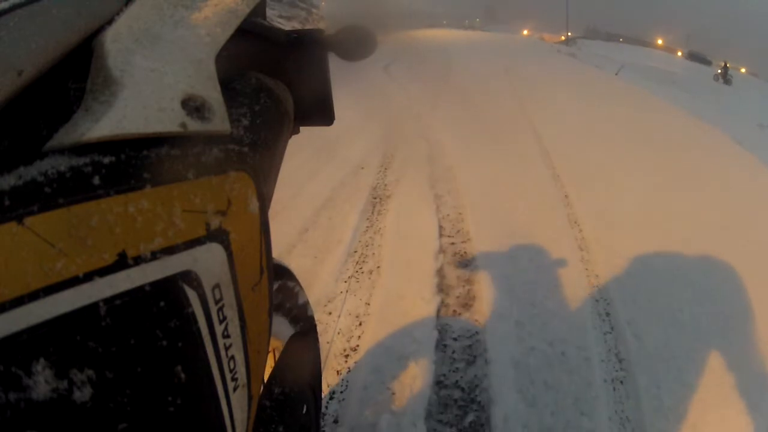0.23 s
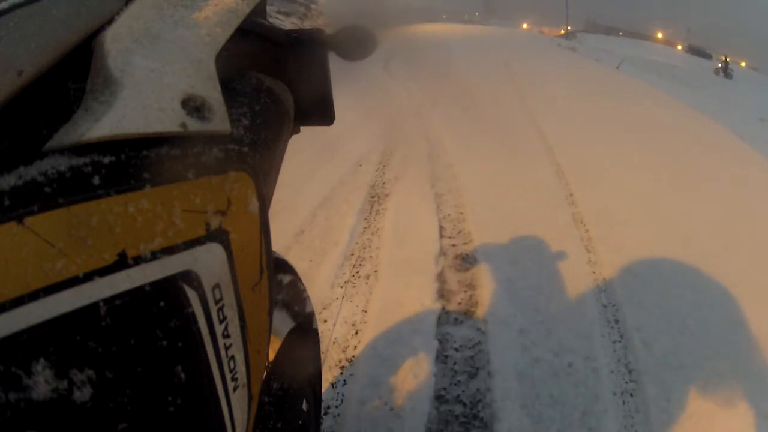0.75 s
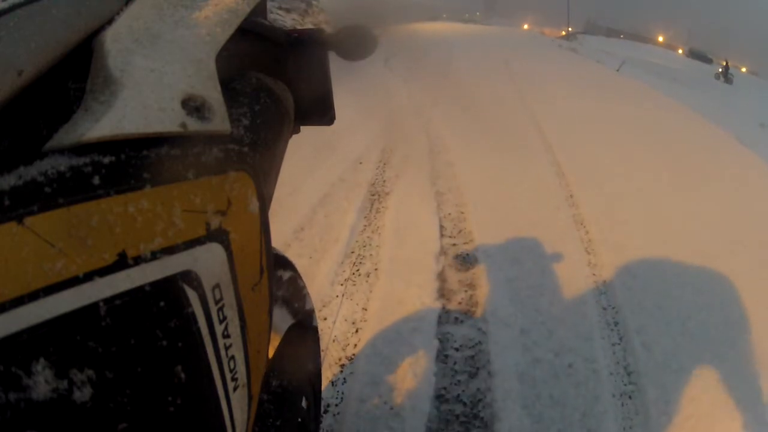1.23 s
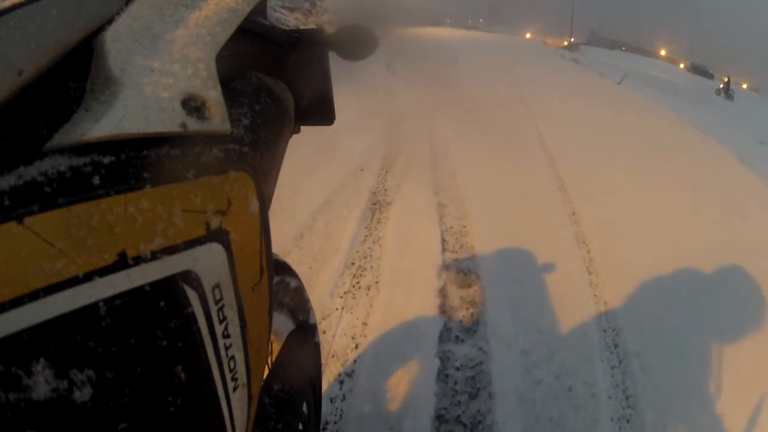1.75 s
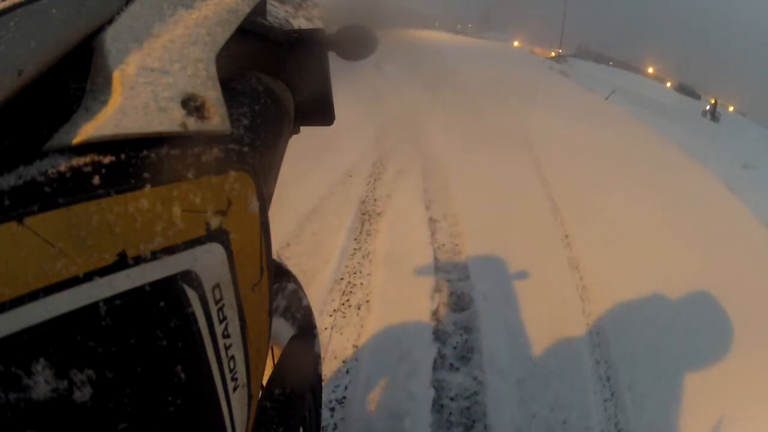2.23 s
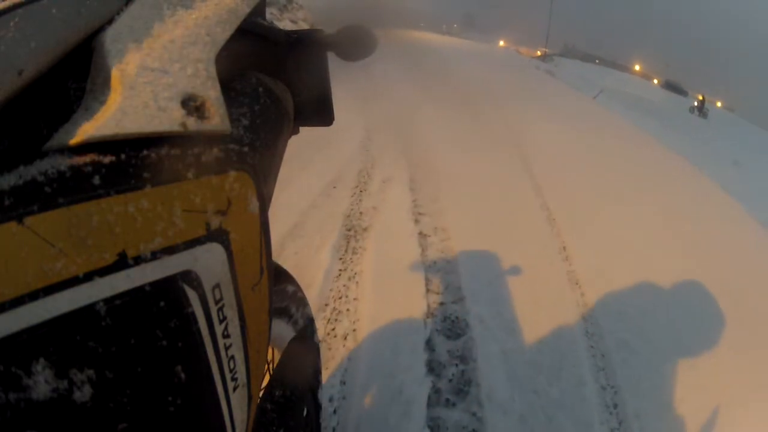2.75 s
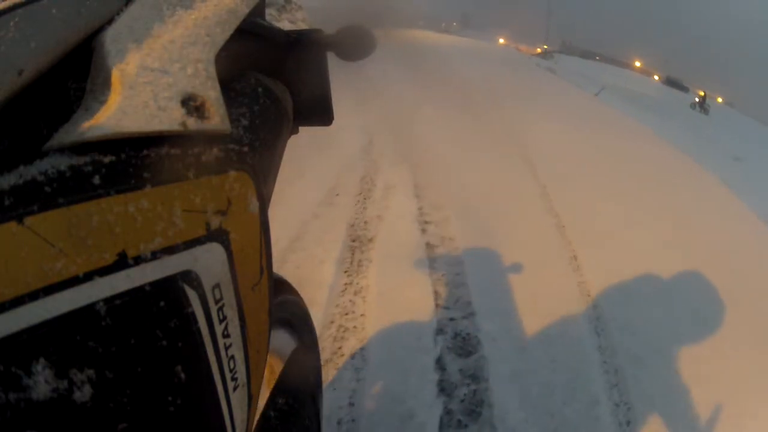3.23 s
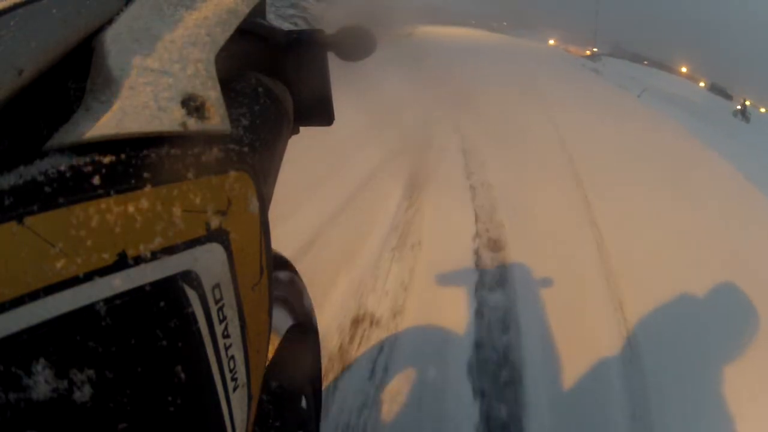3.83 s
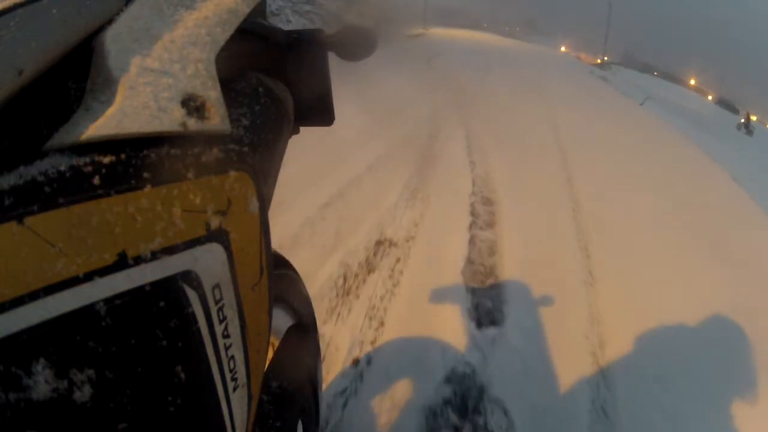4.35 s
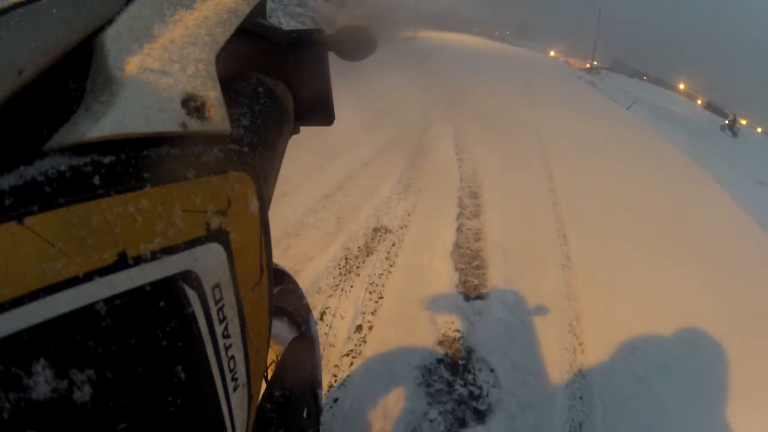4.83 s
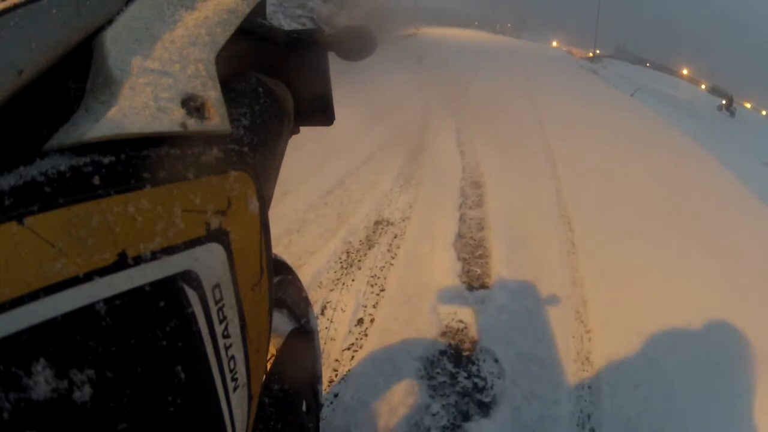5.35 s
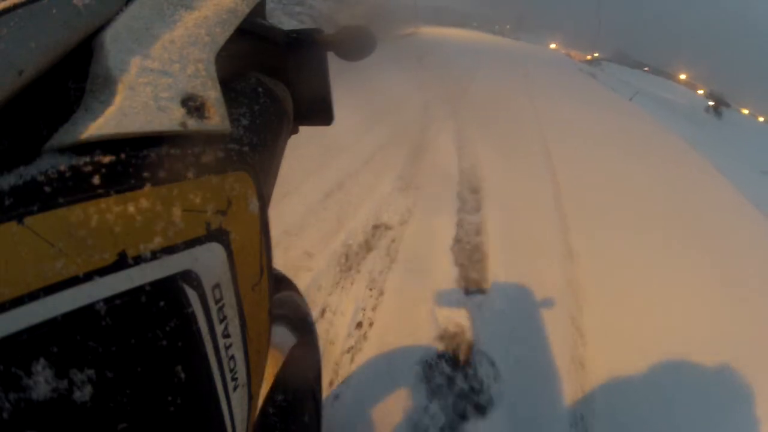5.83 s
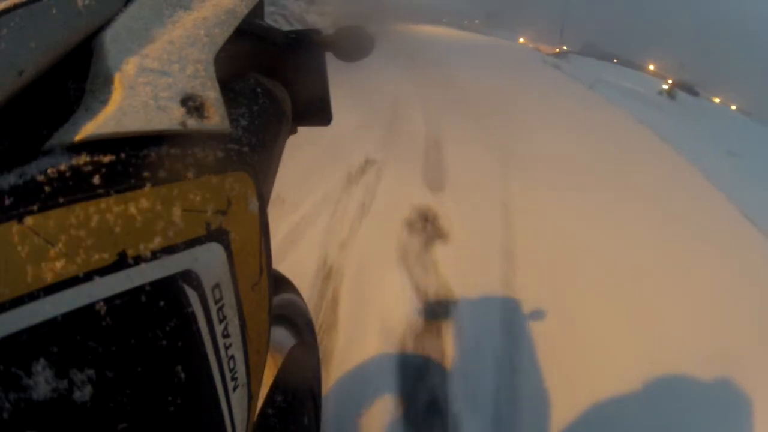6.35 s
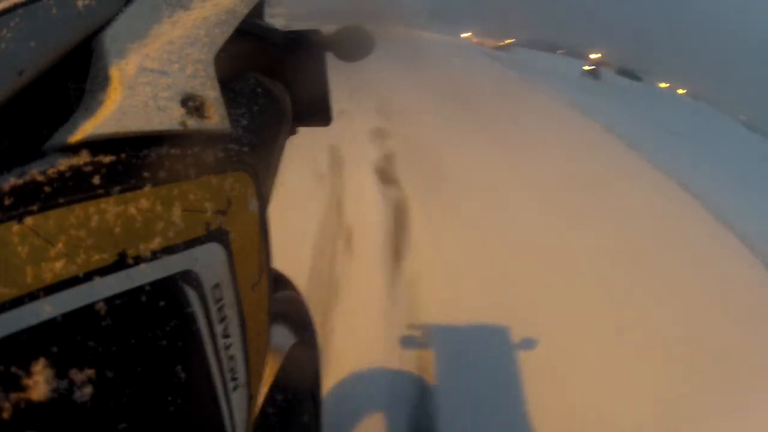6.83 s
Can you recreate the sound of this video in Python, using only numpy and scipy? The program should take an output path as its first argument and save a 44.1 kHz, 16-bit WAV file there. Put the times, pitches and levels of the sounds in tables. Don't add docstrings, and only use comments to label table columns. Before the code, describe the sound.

A small two-stroke motorbike on snow, heard very close through a cheap microphone fixed to its shaking frame. From 0 to 1 s the closed-throttle engine slows, with dry irregular exhaust cracks about ten a second over falling frame hum. From 1 to 2.6 s it is quietest: ticking casing rattle, soft port hiss, low clamp hum, faint weak pops. Cracks gather from 2.66 s and at 2.87 s it leaps into a hard barking pull, snow drumming on the mudguard, wavering as the tyre slips until 3.74 s. Separate sharp pops follow as revs drop, to 4.6 s. Brief blips come at 4.6 and 4.9 s with cracks between. At 5.4 s it surges upward, reaching full speed by 5.65 s: a dense, rough, buzzing roar with heavy low vibration, dipping slightly around 6.2 s and climbing again to the 7 s end. Light wind rumble and metallic, fizzy clipping throughout.

```python
import sys
import numpy as np
from scipy import signal
from scipy.fft import rfft, irfft
from scipy.io import wavfile
from scipy.ndimage import uniform_filter1d

SR = 44100
rng = np.random.default_rng(int(sys.argv[2]) if len(sys.argv) > 2 else 0)


def convert_level_to_amplitude(level_db):
    exponent = np.asarray(level_db, float) / 20
    return 10 ** exponent


def to_wav(s):
    ch = np.atleast_2d(s).T
    pcm = np.round(np.clip(ch, -1, 1) * 32767)
    wavfile.write(sys.argv[1], SR, pcm.astype(np.int16))


N = 312224


def rms_one(x):
    return x / np.sqrt(np.mean(x ** 2) + 1e-20)


def drift(rate_hz):
    r = np.exp(-80 * np.pi * rate_hz / SR)
    slow = signal.lfilter([1], [1, -2 * r, r * r], rng.standard_normal(N // 40 + 2002))[2000:]
    return np.interp(np.arange(N) / 40, np.arange(len(slow)), rms_one(slow))


def bumps(rows):
    clock = np.arange(N) / SR
    return sum(size * np.maximum(0, 1 - np.abs(clock - s) / half_s) for s, size, half_s in rows)


def at_speed(points, speed):
    turns_per_s, level_db = np.transpose(points)
    return np.interp(np.log(speed), np.log(turns_per_s), level_db)


def burst(rise_s, fall_s):
    t = np.arange(SR // 25) / SR
    shape = (1 - np.exp(-t / rise_s)) ** 2 * np.exp(-t / fall_s)
    return shape / np.sqrt(np.sum(shape ** 2))


def resonate(x, modes):
    click = np.arange(SR // 4) == 0
    out, answer = 0, 0
    for k, (hz, width_hz, level_db) in enumerate(modes):
        r = np.exp(-np.pi * width_hz / SR)
        b = (-1) ** k * convert_level_to_amplitude(level_db) * (1 - r * r) / 2 * np.array([1, 0, -1])
        a = [1, -2 * r * np.cos(2 * np.pi * hz / SR), r * r]
        out = out + signal.lfilter(b, a, x + 1e-18)
        answer = answer + signal.lfilter(b, a, click + 1e-18)
    return out / np.sqrt(np.sum(answer ** 2))


def once_a_turn(turns, offset):
    return np.diff(np.floor(turns - offset), prepend=np.floor(turns[0] - offset)) > 0


# (time [s], speed [turns/s])
SPEED = [(0, 55.5), (.58, 36.7), (1.02, 22.5), (2.72, 24.4), (3.02, 79), (3.8, 71.5), (3.97, 53),
         (4.14, 54.8), (4.3, 44.5), (4.6, 38), (4.72, 60.5), (4.87, 56), (5.02, 85), (5.4, 69), (5.53, 109),
         (5.6, 145), (6.32, 142.7), (7.0, 155.5)]
# (time [s], speed change [turns/s], half length [s])
SURGES = [(1.5, -1.2, .3), (2.08, 6.5, .42), (3.055, 7, .055), (3.2, 3, .08), (3.36, -2.5, .1),
          (3.55, 4, .1), (3.72, -2, .08), (3.97, -1, .05), (5.15, -3.5, .12), (5.33, -2.5, .07),
          (5.645, 12, .045), (5.718, -8, .05), (5.79, 3, .06), (6.14, -7, .1), (6.23, -7.5, .09),
          (6.43, -6.5, .1)]


def crank_speed():
    s, turns_per_s = np.transpose(SPEED)
    return np.interp(np.arange(N) / SR, s, turns_per_s) + bumps(SURGES)


def crank_turns(speed):
    start_turn, lead_s, settle_s = -.27, .0022, .06
    turns = start_turn + np.cumsum(speed) / SR
    firings_s = [row[0] for row in STRAY_IDLE[1:] + STRAY_COAST + PULLS[:4]]
    at = np.sort([round((s + lead_s) * SR) for s in firings_s])
    nudge, nudges = 0, []
    for i in at:
        nudge += round(turns[i] + nudge) - turns[i] - nudge
        nudges.append(nudge)
    return turns + uniform_filter1d(np.interp(np.arange(N), at, nudges), round(settle_s * SR))


def throttle():
    lag_s = 0.061
    clock = np.arange(N) / SR
    wide = np.minimum(sum((clock >= p[0]) * (clock <= p[1]) * 1. for p in PULLS), 1)
    return uniform_filter1d(wide, round(lag_s * SR) + 1)


def wind(second_db):
    band = signal.butter(2, [34, 70], "band", fs=SR, output="sos")
    gusts = signal.sosfilt(band, rng.standard_normal(N))
    return convert_level_to_amplitude(-40 + .5 * (second_db + 24) + 3.5 * drift(3.6)) * rms_one(gusts)


# (time [s], level [dB], half length [s])
CHURN = [
    (6.25, 20, .45),
    (2.87, 21, 0.16),
]
# (frequency [Hz], width [Hz], level [dB])
CHURN_BODY = [(192, 29, 7.6), (520, 230, -3.5), (650, 110, -7.5)]


def churn():
    return convert_level_to_amplitude(-43 + bumps(CHURN) + 4.1 * drift(14)) * resonate(rng.standard_normal(N), CHURN_BODY)


# (frequency [Hz], width [Hz], level [dB])
CLAMP = [(88.1, 4.5, 0.2), (155.4, 9, -3), (278.6, 15.2, -11.5), (390, 13.5, -12.5)]


def clamp(speed, turns):
    kicks = once_a_turn(turns, .2) * convert_level_to_amplitude(rng.normal(0, 0.79, N)) * np.sqrt(SR / speed)
    stir = 0.91 * rng.standard_normal(N)
    return convert_level_to_amplitude(-25 + 2.15 * drift(7.5)) * resonate(kicks + stir, CLAMP)


# (speed [turns/s], level [dB])
CLATTER = [(22, -36), (29, -31), (45, -27.5), (70, -21.5), (150, -32.5)]
# (frequency [Hz], width [Hz], level [dB])
CASING = [(895, 40, -1), (1130, 70, -5), (1235, 70, -3), (1660, 90, -10), (1760, 70, -13), (2185, 50, -11),
          (2400, 80, -19), (3300, 500, -39), (3830, 200, -34), (5200, 400, -52)]
# (frequency [Hz], width [Hz], level [dB])
PORT = [(2196, 136, 26.5), (2420, 130, -24), (3550, 180, 13)]


def clatter(speed, turns, wide):
    open_db = -3
    clatter_db = at_speed(CLATTER, speed) + open_db * wide
    per_turn = np.sqrt(SR / speed)
    pulse = (1 + .4 * np.cos(2 * np.pi * (turns - .1))) * convert_level_to_amplitude(1.5 * drift(30))
    knocks = once_a_turn(turns, -.05) * convert_level_to_amplitude(rng.normal(0, 0.47, N)) * per_turn
    knocks = signal.sosfilt(signal.butter(2, 2000, fs=SR, output="sos"), knocks)
    rattle = resonate(rng.standard_normal(N) * pulse + .7 * knocks, CASING)
    ticks = once_a_turn(turns, -0.38) * convert_level_to_amplitude(rng.normal(0, 0.64, N)) * per_turn
    hiss = signal.oaconvolve(ticks, burst(rise_s=.002, fall_s=.0025))[:N] * rng.standard_normal(N)
    hiss_db = -18.6 - 0.27 * (speed - 25)
    return convert_level_to_amplitude(clatter_db - 3.0) * (rattle + convert_level_to_amplitude(hiss_db) * resonate(resonate(hiss, PORT), PORT))


# (speed [turns/s], level [dB])
HIGH_ORDERS = [(22, -37), (29, -26.5), (37, -16), (43, -25.5), (51, -15), (60, -24), (76, -25), (145, -38)]
# (time [s], level [dB], half length [s])
FRAME_SWELLS = [
    (.12, 5, 0.2),
    (.58, 2.5, 0.1),
    (.85, 8, 0.15),
    (1.45, 2, .25),
    (2.0, 2.5, 0.27),
    (3.5, 1, .3),
    (4.05, -11, 0.26),
    (5.5, -6.5, 0.14),
]
# (frequency [Hz], width [Hz], level [dB])
FRAME = [(85.8, 20.4, 2), (144.9, 16.9, -1), (183, 180, -13.5), (272.8, 43, -5.5), (405.5, 43, -4.5),
         (475, 49, -20.5), (523, 100, -23.5)]


def frame(speed, felt, turns, wide):
    open_db, labour_db_per_surge, fade_speed = 6, 0.27, 92
    rumble_db = at_speed(HIGH_ORDERS, felt) + open_db * wide
    rumble_db = rumble_db - labour_db_per_surge * bumps(SURGES) + bumps(FRAME_SWELLS)
    grid_hz = np.arange(5000.)
    peaks = np.array([convert_level_to_amplitude(db) / (1 + (2 * (grid_hz - hz) / width_hz) ** 2) for hz, width_hz, db in FRAME])
    housing_extra = convert_level_to_amplitude(np.minimum(-2 + (speed - 23), 24)) - 1
    lines, power = 0, 1e-12
    for order in range(3, 22):
        hz = order * speed
        gain = np.interp(hz, grid_hz, peaks.sum(0)) + housing_extra * np.interp(hz, grid_hz, peaks[1])
        wander = convert_level_to_amplitude(2.0 * drift(6))
        slip = .012 * order * drift(6)
        lines = lines + gain * wander * np.cos(2 * np.pi * (order * turns + rng.random() + slip))
        power = power + gain ** 2 / 2
    lines = lines / np.sqrt(power)
    jolts = rms_one(resonate(resonate(rng.standard_normal(N), FRAME), FRAME))
    jolt_share = .28 * (speed / 25) ** .6
    line_share = 0.67 * np.minimum(1, fade_speed / speed) ** 2
    return convert_level_to_amplitude(rumble_db) * (line_share * lines + jolt_share * jolts)


# (speed [turns/s], level [dB])
FIRST_ORDER = [(24, -50), (48, -28), (72, -19), (84, -11.5), (100, -15.5), (135, -20.5), (144, -3.5),
               (155, -3)]
SECOND_ORDER = [(27, -45), (37, -42), (42, -10), (53, -26), (74, -14), (90, -12.5), (136, -11.5),
                (150, -16)]
# (time [s], first order [dB], second order [dB], half length [s])
ORDER_SWELLS = [(.12, -1, -12, 0.18), (2.48, -8, -4, .1), (3.202, -18, -9, 0.11), (3.355, 10.5, 0.1, 0.041),
                (4.37, 0.1, 2.5, 0.19), (4.872, -6, -11, 0.12), (5.268, 11, 4.5, .08), (5.364, -9, 2, 0.065),
                (5.5, 3.5, -4, 0.13), (5.607, 2, 4, 0.032), (5.739, -10, -3, 0.03), (5.912, -1.5, -24, 0.12),
                (6.44, -9, 3.5, 0.24), (7.006, -2, 1, 0.067)]


def mount_levels(felt, wide):
    open_second_db = -5
    first_db = at_speed(FIRST_ORDER, felt) + bumps([(s, db, half_s) for s, db, _, half_s in ORDER_SWELLS])
    second_db = at_speed(SECOND_ORDER, felt) + bumps([(s, db, half_s) for s, _, db, half_s in ORDER_SWELLS])
    return first_db, second_db + open_second_db * wide


def low_orders(turns, first_db, second_db):
    first = convert_level_to_amplitude(first_db + .6 * drift(12)) * np.cos(2 * np.pi * turns)
    second = convert_level_to_amplitude(second_db + 1.3 * drift(30)) * np.cos(4 * np.pi * turns + 0.41)
    return np.sqrt(2) * (first + second)


# (first firing [s], end [s], crack [dB], bark over crack [dB], ring over crack [dB])
PULLS = [
    (2.866, 3.741, -29.5, 11, 6.5),
    (4.599, 4.747, -31, 12, 7.5),
    (4.908, 5.033, -30.5, 13, 7.5),
    (5.398, 5.626, -29.5, 14, 7.5),
    (5.652, 6.667, -33.5, 16, 6),
    (6.628, 7.094, -34.5, 13, 3.5),
]
# (time [s], crack peak [dB])
STRAY_IDLE = [(.0094, -25), (0.0758, -31), (0.0941, -27), (.195, -24.5), (.2589, -40), (0.326, -22),
              (0.4189, -21), (.5198, -21.5), (0.6295, -23), (0.8574, -28), (0.9727, -38.5), (1.058, -40.5),
              (1.1426, -51), (1.2379, -60), (1.281, -63), (1.3701, -52), (1.4592, -52), (1.508, -67),
              (1.5964, -47), (1.684, -64), (1.7247, -47), (1.8064, -31), (1.92, -32.5), (2.0232, -28),
              (2.1269, -58), (2.162, -46), (2.2326, -32), (2.3428, -32), (2.4577, -53), (2.5375, -50)]
STRAY_COAST = [(2.661, -33), (2.7362, -37.5), (2.77, -27), (2.799, -22), (2.823, -19), (2.845, -17.5),
               (3.8548, -66), (3.8699, -22.5), (3.8842, -14.5), (4.0309, -20), (4.123, -38), (4.141, -21.5),
               (4.2433, -39), (4.3288, -21), (4.4221, -18.5), (4.521, -20), (4.8229, -42), (4.839, -20.5),
               (4.856, -23), (4.891, -16.5), (5.1398, -32), (5.1507, -16), (5.1654, -26), (5.2742, -57),
               (5.3138, -34), (5.3282, -19.5), (5.3425, -20.5), (5.3853, -14.5)]


def firings(speed, turns, wide):
    labour_db_per_surge, shut_s, shut_db = 0.26, 0.027, -5
    full_db, bark_keeps, ring_keeps = -19, 0.73, 0.49
    blows, clock = np.zeros((3, N)), np.arange(N) / SR
    uneven_db = rng.standard_normal((3, N)) * 0.37
    ahead = np.roll(wide, -round(shut_s * SR))
    load_db = -labour_db_per_surge * bumps(SURGES) + shut_db * (1 - ahead) * (clock < PULLS[-1][0])
    last_end = 0
    for start, end, crack_db, bark_db, ring_db in PULLS:
        if start > last_end + .05:
            fires = once_a_turn(turns, turns[round(start * SR)])
        else:
            start = last_end
        on = fires * (clock >= start) * (clock < end) * np.sqrt(SR / speed)
        part_db = np.array([[0.5], [bark_db - 1.5], [ring_db + 2.0]])
        blows += on * convert_level_to_amplitude(crack_db + load_db + part_db + uneven_db)
        last_end = end
    for s, peak_db in STRAY_IDLE + STRAY_COAST:
        weak_db = full_db - peak_db
        part_db = np.array([18, 27.5 + bark_keeps * weak_db, 26.5 + ring_keeps * weak_db])
        blows[:, round(s * SR)] += convert_level_to_amplitude(peak_db + part_db)
    return blows


# (delay [s], level [dB])
PIPE_ECHOES = [(.0042, -6.5), (.0072, -18.5), (0.013, -16.5)]


def blast(clicks, modes, rise_s, fall_s, fresh):
    shape = burst(rise_s, fall_s)
    eddies = rfft(shape * rng.standard_normal(len(shape)))
    eddies = irfft(eddies / np.abs(eddies))[:len(shape) // 2]
    rush = signal.oaconvolve(clicks, eddies)[:N]
    gas = rush + fresh * signal.oaconvolve(clicks, shape)[:N] * rng.standard_normal(N)
    pipe = gas.copy()
    for delay_s, echo_db in PIPE_ECHOES:
        lag = round(delay_s * SR)
        pipe[lag:] -= convert_level_to_amplitude(echo_db) * gas[:-lag]
    return resonate(pipe, modes)


# (frequency [Hz], width [Hz], level [dB])
CRACK = [(2893, 440, -2), (3682, 1700, -3.5), (3787, 166, 4.5), (4397, 340, -5.5), (4704, 1050, -4),
         (5240, 234, -1.5), (5430, 720, -10)]
BARK = [(838, 33, -10.5), (1092, 21, -12), (1198.4, 41.3, 6), (1470, 43, -4), (1620, 183, -4),
        (1769, 283, -5), (1943, 24.4, -4)]
RING = [(2163, 32, 9), (2425, 170, 1.5), (2580, 88, -0.5), (2715, 130, -9)]
THUMP = [(269.4, 34, -6.5), (365.2, 31, -1), (520, 13.6, -11), (899.6, 39, -4.5)]
# (frequency [Hz], width [Hz], level [dB])
PIPE_TUNE = [(630, 87, -17), (200, 120, 20)]


def exhaust(speed, turns, wide):
    cracks, barks, rings = firings(speed, turns, wide)
    rough = 1 + .02 * np.maximum(0, speed - 100)
    crack = blast(cracks, CRACK, rise_s=0.0012, fall_s=0.00063, fresh=0.3 * rough)
    bark = blast(barks, BARK, rise_s=0.00033, fall_s=0.0057, fresh=0.2 * rough)
    ring = blast(rings, RING, rise_s=0.0014, fall_s=0.00085, fresh=0.24 * rough)
    song = resonate(barks * convert_level_to_amplitude(-10.5 + 0.8 * (speed - 136)), PIPE_TUNE)
    thump = resonate(barks * convert_level_to_amplitude(-0.5 - 0.22 * (speed - 38)), THUMP)
    return crack + bark + ring + song + thump


def scene():
    mount_lag_s = 0.018
    speed = crank_speed()
    turns = crank_turns(speed)
    wide = throttle()
    keep = np.exp(-1 / (mount_lag_s * SR))
    felt = speed[0] + signal.lfilter([1 - keep], [1, -keep], speed - speed[0])
    first_db, second_db = mount_levels(felt, wide)
    background = wind(second_db) + churn() + clamp(speed, turns)
    shake = frame(speed, felt, turns, wide) + low_orders(turns, first_db, second_db)
    engine = clatter(speed, turns, wide) + exhaust(speed, turns, wide)
    return (background + shake + engine)[None]


def low_pass(x):
    return signal.sosfilt(signal.butter(12, 15780, fs=SR, output="sos"), x)


def record(dry):
    hold_hz = 12000
    coarse = signal.resample_poly(dry, hold_hz // 300, SR // 300, axis=1)
    coarse = coarse / (1 + (coarse / 1.3) ** 4) ** .25
    held = np.repeat(coarse, 4, axis=1)
    x = signal.resample_poly(held, SR // 300, 4 * hold_hz // 300, axis=1)[:, :N]
    x = np.pad(x, ((0, 0), (0, N - x.shape[1])))
    x = signal.sosfilt(signal.cheby2(14, 60, 15580, fs=SR, output="sos"), x)
    return low_pass(np.clip(x, -1, 1))


dry = scene()
out = record(dry)
to_wav(out)
```